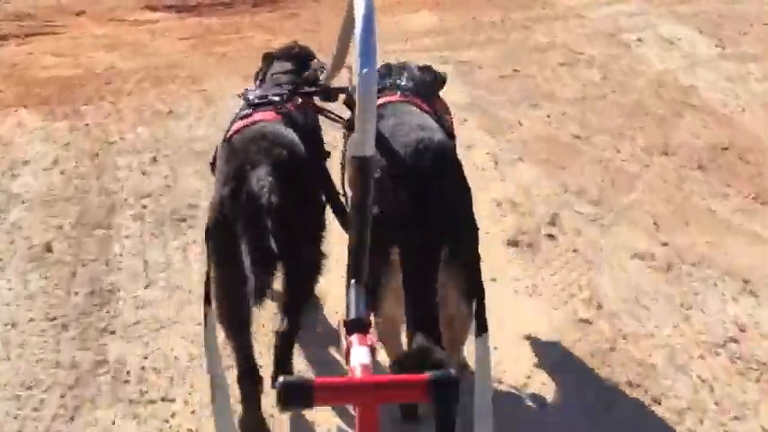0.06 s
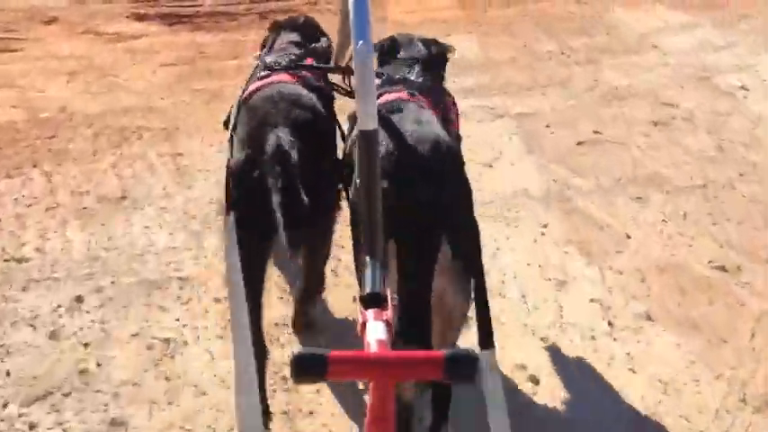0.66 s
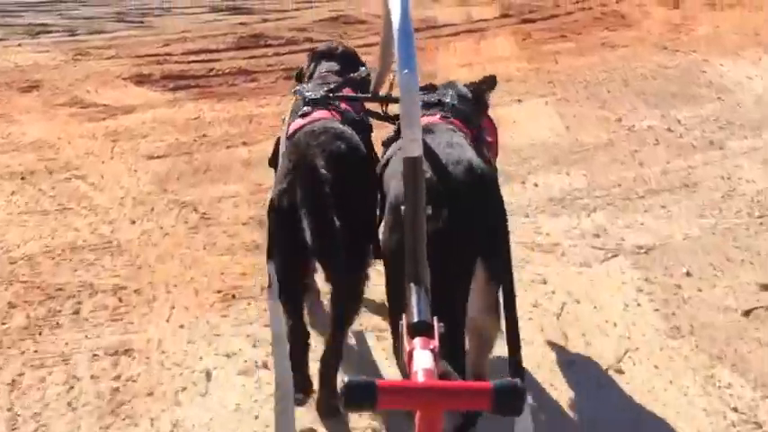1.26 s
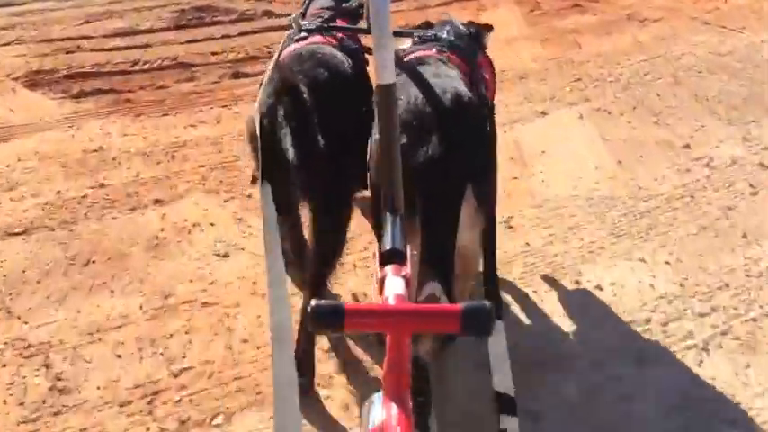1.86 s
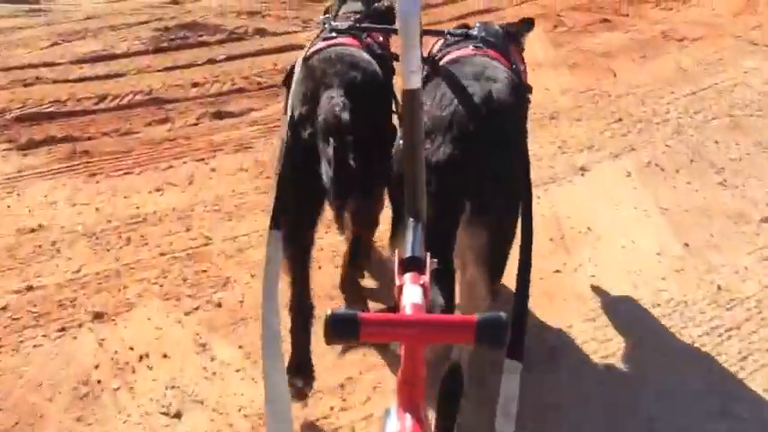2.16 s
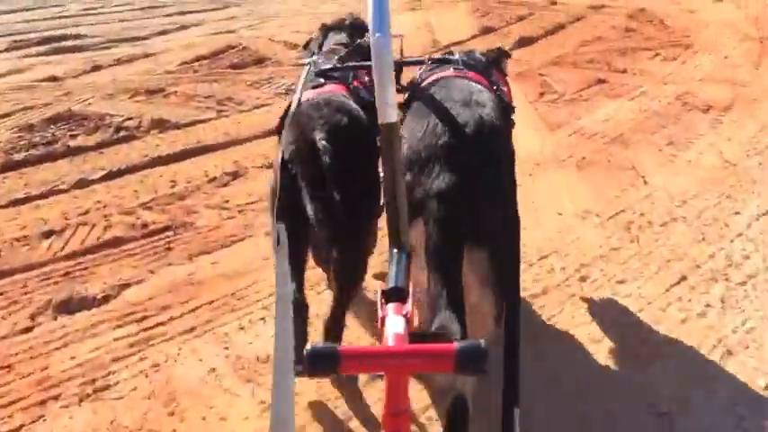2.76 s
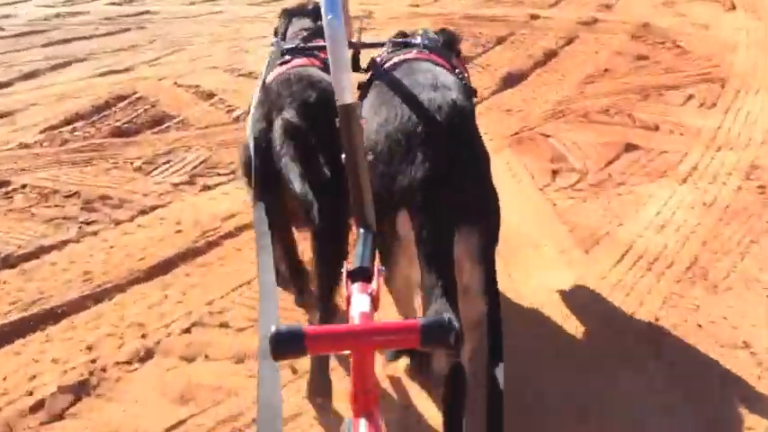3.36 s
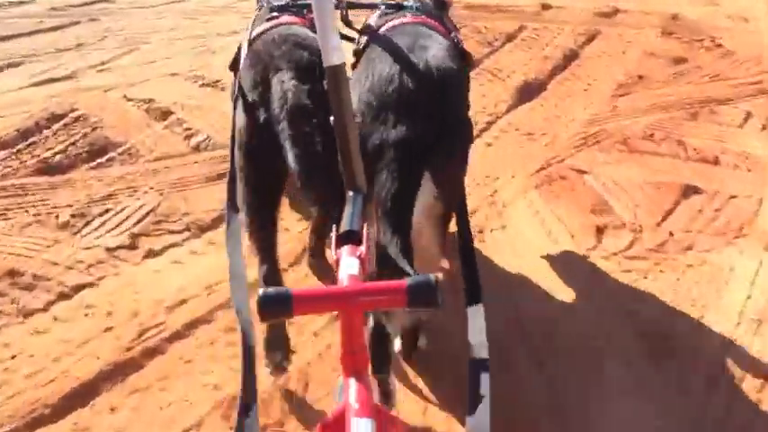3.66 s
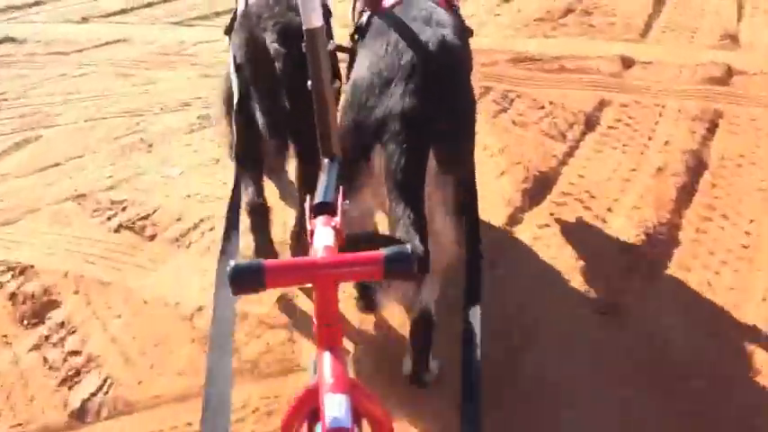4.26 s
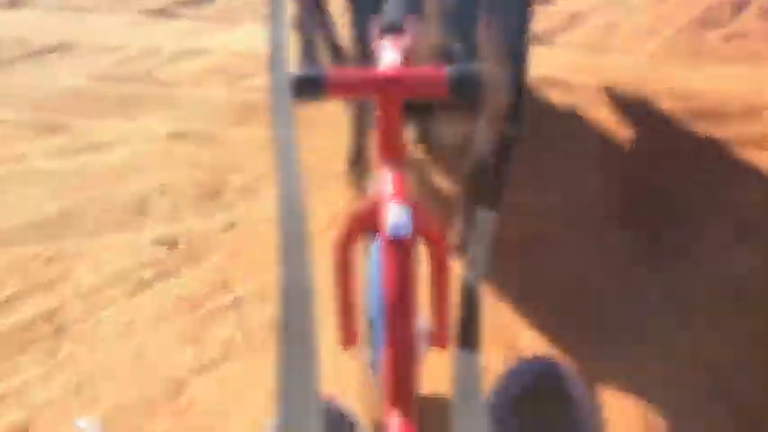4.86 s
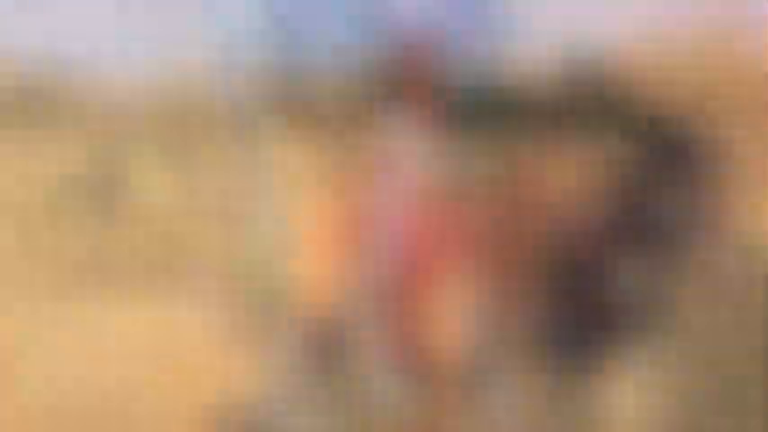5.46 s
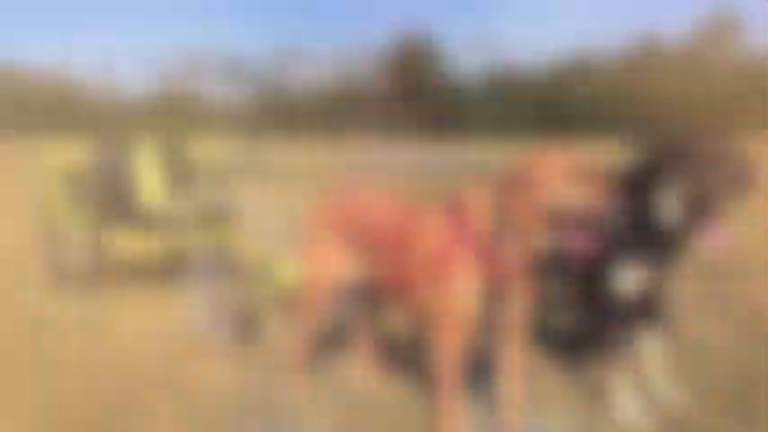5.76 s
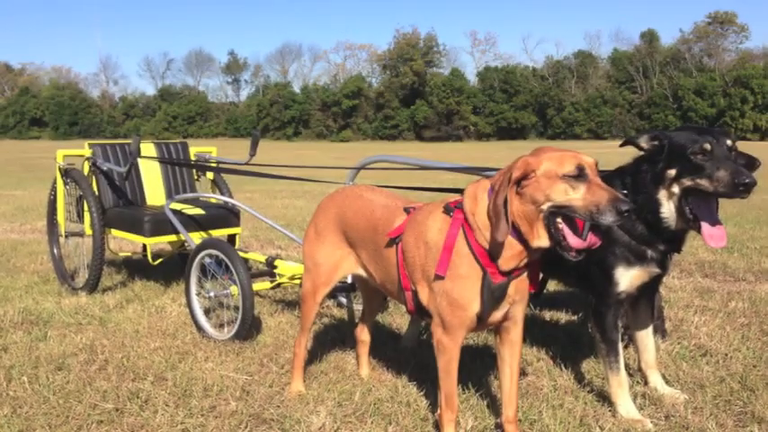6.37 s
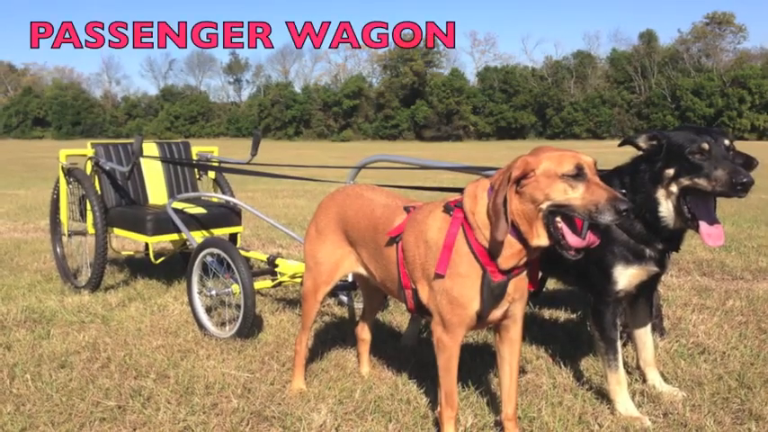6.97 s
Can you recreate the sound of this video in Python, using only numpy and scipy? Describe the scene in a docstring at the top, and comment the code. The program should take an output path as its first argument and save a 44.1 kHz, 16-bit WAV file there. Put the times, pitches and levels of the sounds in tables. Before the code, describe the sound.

Heard from on board outdoors, a small dog-drawn cart rumbles steadily across uneven dirt, with a low hum like a far engine underneath. Sand crunches softly, small stones snap under the tyres, and harness parts click and patter throughout. A small metal clink and a sharp knock sound near the start, and the wheels squeak faintly at times. The hitch judders and rattles more busily as the sound fades to silence.

```python
"""Dog cart on sandy dirt

Two dogs pull a light wheeled cart, heard from the seat. Uneven ground drives the frame into a rumble
over a low hum, perhaps a far engine. Grit crackles under tyres and paws, and friction gives a faint,
recurring, falling squeak. Impacts excite the modes of hitch, harness and frame: ticks, rattles,
dull jolts, a few clinks and one hard knock. Everything fades out."""
import sys
import numpy as np
from scipy import signal
from scipy.fft import rfft, irfft, next_fast_len
from scipy.io import wavfile

SR = 44100
rng = np.random.default_rng(int(sys.argv[2]) if len(sys.argv) > 2 else 0)


def put_to_file(sound):
    """Save the sound as 16-bit audio at rate SR, in the file named by the first command-line argument."""
    columns = np.atleast_2d(sound).T  # one column per channel
    safe = np.clip(columns, -1, 1)
    whole_steps = np.round(safe * 32767)
    wavfile.write(sys.argv[1], SR, whole_steps.astype(np.int16))


N = 308679
TIME = np.arange(N) / SR


def from_db(db):
    """Amplitude ratio of a level in decibels."""
    return 10 ** (np.asarray(db) / 20)

def unit_rms(x):
    """Normalisation to unit power."""
    return x / np.sqrt(np.mean(x ** 2) + 1e-20)

def envelopes(rows):
    """Linear interpolation of each column over time."""
    s, *columns = np.transpose(rows)
    return [np.interp(TIME, s, column) for column in columns]

def drift(rate_hz):
    """Random modulation: low-passed noise of unit rms."""
    step, settle = 40, 2000
    pole = np.exp(-2 * np.pi * rate_hz * step / SR)
    noise = rng.standard_normal(N // step + settle + 2)
    slow = signal.lfilter([1], [1, -2 * pole, pole * pole], noise)[settle:]
    return np.interp(np.arange(N) / step, np.arange(len(slow)), unit_rms(slow))

def band(x, low_hz, high_hz):
    """Band-pass filtering between two edges."""
    return signal.sosfilt(signal.butter(2, [low_hz, high_hz], "band", fs=SR, output="sos"), x)

def colour(x, spectrum):
    """Spectral shaping by a curve interpolated in log frequency."""
    hz, db = np.transpose(spectrum)
    size = next_fast_len(N)
    bins = np.maximum(np.arange(size // 2 + 1) * SR / size, 1)
    gain = from_db(np.interp(np.log(bins), np.log(hz), db, left=-70, right=-70))
    return irfft(rfft(x, size) * gain, size)[:N]

def resonate(x, hz, width_hz):
    """Forced response of a damped oscillator with unit peak gain."""
    r = np.exp(-np.pi * width_hz / SR)
    feedback = [1, -2 * r * np.cos(2 * np.pi * hz / SR), r * r]
    return signal.lfilter(np.array([1, 0, -1]) * (1 - r * r) / 2, feedback, x + 1e-18)

def grains(per_s, spread_db):
    """Shot noise: impulses at random moments, a few much larger than the rest."""
    sizes = from_db(spread_db * np.minimum(rng.exponential(1, N), 4))
    return unit_rms(sizes * rng.choice([-1, 1], N) * (rng.random(N) < per_s / SR))

def strike(impacts, modes, in_phase=False, detune=0):
    """Free vibration: each impact starts damped modes, which crack harder when in phase."""
    out, t = np.zeros(N), np.arange(SR // 8) / SR
    hz, db, t60 = np.transpose(modes)[:, :, None]
    polarity = (1 if in_phase else -1) ** np.arange(len(modes))[:, None]
    decays = polarity * from_db(db - 60 * t / t60)
    for s, level_db in impacts:
        at = int(s * SR)
        pitches = hz * (1 + detune * rng.standard_normal(hz.shape))
        out[at:at + len(t)] += from_db(level_db) * np.sum(decays * np.sin(2 * np.pi * pitches * t), 0)
    return out


# Course of the far hum: (time [s], level [dB])
HUM_LEVELS = [(0, -47.5), (1.3, -54.5), (2.0, -45.5), (3.5, -46), (4.2, -43.5), (5.4, -41.5)]
# Its partials: (harmonic number, level [dB])
HUM_HARMONICS = [(1, -24.5), (3, -7), (4, -5.5), (6, -17.5), (8, -25.5)]

def hum(fundamental_hz=39.6):
    """Harmonic series on a nearly steady fundamental; each partial wavers on its own."""
    cycles = np.cumsum(fundamental_hz * (1 + 0.00401 * drift(1.18))) / SR
    partials = sum(from_db(db + 2 * drift(6.5)) * np.sin(2 * np.pi * (k * cycles + rng.random()))
                   for k, db in HUM_HARMONICS)
    return from_db(envelopes(HUM_LEVELS)[0]) * np.sqrt(2) * partials


# Shaking of the cart: (frequency [Hz], spectral level [dB])
RUMBLE_SPECTRUM = [(20, -40.5), (40, -12.5), (62, -3), (100, -4.5), (150, 1.5), (220, -0.5), (300, -4.5),
                   (360, -11.5), (600, -21.5), (1200, -43)]
# Low modes of frame and seat: (frequency [Hz], bandwidth [Hz], level [dB])
BOOM_MODES = [(72.9, 9.7, -5.5), (131.6, 9.3, -5.5), (168.4, 4.2, -14.5), (220.6, 1.6, -10),
              (250.6, 13, -23), (273, 17, -14)]

def rumble():
    """Random forcing: uneven ground shakes the cart, which booms at its low modes."""
    shake = unit_rms(colour(rng.standard_normal(N), RUMBLE_SPECTRUM))
    booms = sum(from_db(db) * unit_rms(resonate(rng.standard_normal(N), hz, width))
                for hz, width, db in BOOM_MODES)
    return unit_rms(shake + booms) * from_db(0.93 * drift(5.8))


# Resonances of hitch and frame tubes: (frequency [Hz], bandwidth [Hz], gain [dB])
FRAME_MODES = [(367.7, 78, -6), (1220, 120, -8.5), (1822, 260, 6.5), (2400, 220, -2), (3360, 150, -14.5),
               (3782, 120, 4.5), (4013, 150, 3), (5600, 570, 5.5), (5970, 170, 9.5), (6650, 370, 12),
               (8350, 270, -9), (12820, 88, -11)]

def through_frame(x, ring_db, loose=False):
    """Structure-borne sound: tube resonances join the direct sound, and vary if parts are loose."""
    scatter = rng.standard_normal((len(FRAME_MODES), 2)) * loose
    rings = sum(from_db(db + 2.5 * louder) * resonate(x, hz * np.exp(0.045 * sharper), width)
                for (hz, width, db), (sharper, louder) in zip(FRAME_MODES, scatter))
    return x + from_db(ring_db) * rings

def pebbles(per_s):
    """Impulse responses of grains of many sizes, each ringing briefly at its own pitch."""
    pitches = np.geomspace(600, 11000, 14)
    clicks = grains(per_s, spread_db=-0.5)
    size_class = rng.integers(0, len(pitches), N)
    return sum(resonate(clicks * (size_class == k), hz, hz / 9) for k, hz in enumerate(pitches))


# Crushed sand: (frequency [Hz], gain [dB])
GRIT_SPECTRUM = [(200, 0.5), (450, 1), (800, 2), (1400, -3), (2200, -0.5), (2800, -3), (4000, -5),
                 (5500, -9), (7000, -12.5), (9000, -15.5), (12000, -17), (15500, -15)]

def grit():
    """Granular noise: sand hisses and coarser grains crack in clumps as paws and wheels press."""
    pressure = drift(18)
    hiss = rng.standard_normal(N) * from_db(0.92 * pressure)
    cracks = from_db(-0.5) * unit_rms(pebbles(per_s=2200 * from_db(6 * pressure)))
    crumbs = from_db(-9) * grains(per_s=60, spread_db=3)
    return unit_rms(colour(through_frame(hiss + cracks + crumbs, ring_db=-31.5), GRIT_SPECTRUM))


# Paw drags and tyre skids: (time [s], half duration [s], level [dB])
PAW_DRAGS = [(0.198, 0.006, -47), (2.118, 0.043, -51.5), (4.408, 0.011, -57), (6.357, 0.018, -45.5)]
TYRE_SKIDS = [(.743, .012, -56), (.789, .008, -48), (.814, 0.0081, -49), (.856, 0.018, -45.5),
              (.903, .016, -48)]
# Their timbres: (frequency [Hz], spectral level [dB])
PAW_SPECTRUM = [(1200, -13), (2500, 1), (4200, -1), (5500, -3), (9000, -32), (15500, -24)]
SKID_SPECTRUM = [(250, -2), (500, 0), (1100, -3), (1750, 8), (2600, -1), (5000, -17), (12000, -33)]

def scrapes():
    """Sliding friction: paws in sand and tyres on gravel give short swells of dense impacts."""
    out = np.zeros(N)
    for events, spectrum, per_s in [(PAW_DRAGS, PAW_SPECTRUM, 5600), (TYRE_SKIDS, SKID_SPECTRUM, 2800)]:
        swell = sum(from_db(db) * np.exp(-((TIME - s) / half) ** 2) for s, half, db in events)
        out += swell * unit_rms(colour(grains(per_s, spread_db=4.5), spectrum))
    return out


# Squeaks as the wheels turn: (time [s], chirp level [dB], slide level [dB])
SQUEAK_EVENTS = [(0.012, -49, -54.5), (0.195, -56, -65), (1.305, -51.5, -59), (2.007, -55, -61),
                 (2.742, -56, -66), (3.358, -55, -56), (4.676, -60, -60)]
# Course of one squeak: (time from onset [s], frequency [Hz], level [dB])
SQUEAK_GLIDE = [(0, 4200, -4), (0.026, 3750, -1), (0.042, 3400, -3), (.058, 3170, -9), (.075, 2930, -5),
                (0.095, 2500, -7.5), (0.125, 2050, 1), (0.188, 1790, -2.5), (.25, 1820, -5)]

def squeaks(chirp_at_s=0.0685, chirp_half_s=0.0093, roughness=0.52):
    """Stick-slip friction: a scratchy tone falls about an octave, ringing clear for one chirp."""
    out = np.zeros(N)
    s, hz, db = np.transpose(SQUEAK_GLIDE)
    t = np.arange(int(s[-1] * SR)) / SR
    scratch = drift(127) + 1j * drift(127)
    catching = scratch / (1 + np.exp(-1.5 * drift(45)))   # the contact grips and lets go
    waver = 0.015 * drift(40)
    chirp_window = np.exp(-((t - chirp_at_s) / chirp_half_s) ** 2)
    for start, chirp_db, slide_db in SQUEAK_EVENTS:
        span = slice(int(start * SR), int(start * SR) + len(t))
        cycles = np.cumsum(np.interp(t, s, hz) * (1 + waver[span])) / SR
        chirp = from_db(chirp_db) * chirp_window * (1 + roughness * scratch[span])
        slide = from_db(slide_db + np.interp(t, s, db)) * catching[span]
        out[span] += np.real((chirp + slide) * np.exp(2j * np.pi * cycles))
    return from_db(2.5) * out


# Stones under the tyres: (time [s], relative level [dB])
STONE_SNAPS = [(0.198, 1), (0.5645, 3), (0.651, -2), (0.742, 2), (0.789, -2), (0.814, 5), (0.85, 9.5),
               (1.297, 8), (1.78, 8), (1.846, 1), (2.163, 2), (2.173, 4), (2.503, -2), (2.533, -2),
               (2.546, -5), (2.697, -3), (2.86, -3), (3.2025, -5), (3.353, -9), (3.679, -4), (3.692, -5),
               (4.34, 3), (4.484, 7), (5.087, 5.5), (5.367, 1), (6.073, 7)]

def stones(decay_s=0.0022):
    """Broadband transients: each stone snaps and excites four resonances of its own."""
    out, t = np.zeros(N), np.arange(SR // 40) / SR
    for s, db in STONE_SNAPS:
        at = int(s * SR)
        snap = rng.standard_normal(len(t)) * np.exp(-t / decay_s)
        pitches = np.geomspace(3200, 12000, 4) * rng.uniform(0.75, 1.25, 4)
        ring = from_db(-7) * sum(resonate(snap, hz, hz / 20) for hz in pitches)
        out[at:at + len(t)] += from_db(db - 44) * band(snap + ring, 1800, 10300)
    return out


# Jolts from ruts: (time [s], level [dB])
RUT_JOLTS = [(0.415, 2.5), (0.436, 3), (0.4805, 4), (0.531, 2.5), (0.813, -3), (1.4485, 1), (2.181, -2),
             (2.212, 2), (3.186, -1.5), (3.313, -5), (3.852, -4), (4.313, -1.5), (4.391, -3)]
# Modes of the seat: (frequency [Hz], level [dB], T60 [s])
SEAT_MODES = [(154.6, -27.5, 0.046), (201, -34, 0.043)]

def seat_jolts():
    """Shock excitation: ruts drum the seat, too small a radiator for deep bass."""
    return band(strike(RUT_JOLTS, SEAT_MODES, detune=0.067), 115.5, 594)


# The pole meets its stop: (time [s], level [dB])
STOP_IMPACTS = [(0.488, 1.5), (0.838, 0.5), (0.8505, -4), (1.917, -6), (3.3125, -0.5), (4.2035, -3.5),
                (4.854, -3), (5.417, 2.5), (5.436, -1), (5.8928, 10)]
# Modes of that contact: (frequency [Hz], level [dB], T60 [s])
STOP_MODES = [(317, -27.5, 0.0095), (524, -38.5, 0.02), (875, -43, 0.013), (1430, -38.5, 0.0085),
              (1830, -42, 0.031), (2334, -39, 0.058), (3470, -41.5, 0.018), (5560, -53, 0.0083)]

def pole_butts():
    """Damped impact: the loose pole butts dully, at slightly different pitches each time."""
    return strike(STOP_IMPACTS, STOP_MODES, detune=0.067)


# Slips of the hitch: (time [s], level [dB])
HITCH_SLIPS = [(4.3080, -2), (4.3132, 11.5), (4.3164, 9.5), (4.3182, -17.5), (4.3212, 0), (4.3242, -8)]
# Modes of the hitch: (frequency [Hz], level [dB], T60 [s])
HITCH_MODES = [(850, -50, 0.013), (1430, -40, 0.0084), (1850, -40.5, 0.0099), (2280, -39.5, 0.028),
               (2620, -40.5, 0.017), (3134, -49, 0.067), (3470, -42.5, 0.011), (4600, -50, 0.021)]

def hitch_judder():
    """Stick-slip motion: a quick run of slips sets the hitch ringing."""
    return strike(HITCH_SLIPS, HITCH_MODES)


# Contacts of a snap hook: (time [s], level [dB])
HOOK_IMPACTS = [(1.2943, -20), (1.2957, 3), (1.3005, -26), (1.3043, -24), (1.3091, -7), (3.5197, -3.5),
                (4.457, -4)]
# Modes of the hook: (frequency [Hz], level [dB], T60 [s])
HOOK_MODES = [(3750, -29, .013), (4550, -45, .025), (5170, -45, .03), (5700, -38, .028), (6005, -41, .06),
              (6450, -48, .06), (6880, -42, .055), (8100, -48, .02), (12400, -47, .02)]

def hook_clinks():
    """Impact and rebound: a small metal hook rings at its high modes."""
    return strike(HOOK_IMPACTS, HOOK_MODES)


# Contacts within the one knock: (time [s], level [dB])
KNOCK_IMPACTS = [(1.4493, -10), (1.4501, 0), (1.4517, -11.5)]
# Modes of the pole: (frequency [Hz], level [dB], T60 [s])
POLE_MODES = [(330, -35.5, 0.028), (530, -24, 0.012), (750, -31.5, 0.011), (880, -24.5, 0.014),
              (1276, -26.5, 0.0069), (1640, -24, 0.014), (1820, -17, 0.016), (2055, -13, 0.012),
              (2730, -24.5, .007), (3190, -16, 0.017), (3626, -25.5, 0.039), (4200, -10.5, 0.0056),
              (5080, -20, 0.012), (8200, -13.5, 0.005), (11980, -28, 0.0061)]

def pole_knock(shiver_decay_s=0.01):
    """Hard impact: the pole knocks in its joint, its modes start in phase and the frame shivers."""
    age = np.maximum(TIME - KNOCK_IMPACTS[-1][0], 0)
    shiver = unit_rms(band(through_frame(rng.standard_normal(N), ring_db=-14), 330, 5800))
    crack = band(strike(KNOCK_IMPACTS, POLE_MODES, in_phase=True), 150, 14500)
    return from_db(-0.5) * crack + from_db(-28.5) * shiver * (age > 0) * np.exp(-age / shiver_decay_s)


# Thud, clack, main and snap bands of a rattle: (low edge [Hz], high edge [Hz])
RATTLE_BANDS = [(240, 950), (1250, 2100), (2250, 5700), (5800, 15500)]

def bursts(chatter, events, bands_db):
    """Repeated collision: a loose part chatters and dies away; harder contacts are brighter."""
    part_pitches = np.geomspace(418.2, 10520, 10) * np.exp(rng.uniform(-0.2, 0.2, (len(events), 10)))
    out = np.zeros(N)
    for (s, decay, db, hardness_db), pitches in zip(events, part_pitches):
        at = int(s * SR)
        age = np.arange(SR // 8) / (decay * SR)   # in decay times
        tail = from_db(-18) * np.exp(-age / 3.3) * np.minimum(age, 1)
        swell = np.sqrt(age) * np.exp(-age) + tail
        burst = through_frame(chatter[at:at + len(age)] * swell, ring_db=1, loose=True)
        own_ring = from_db(6.5) * sum(resonate(burst, hz, 40 + hz / 35) for hz in pitches)
        levels_db = db + np.array(bands_db) + hardness_db * np.array([0, 0, 1, 1])
        for edges, level_db in zip(RATTLE_BANDS, levels_db):
            part = band(burst + own_ring, *edges)
            out[at:at + len(age)] += from_db(level_db) * part * np.sqrt(decay * SR / np.sum(part ** 2))
    return out

def patter(chatter, per_s=5, decay_s=0.0011):
    """Jittered pulse train: claws and straps tick faintly at an uneven pace."""
    jitter, softness = rng.standard_normal((60, 2)).T
    times = (np.arange(60) + 1 + 0.3 * jitter) / per_s
    events = [(s, decay_s, db, 0) for s, db in zip(times, -54.5 - 3.5 * softness) if 0 < s < 6.5]
    return bursts(chatter, events, bands_db=(5, -1, 0, -12))


# Bursts of contact: (time [s], decay time [s], level [dB], hardness [dB])
BUCKLE_TICKS = [(.139, 0.003, -45.5, -2), (.282, .0024, -55.5, 5), (.391, 0.0016, -43, -1),
                (.458, 0.0048, -43.5, -0.5), (.564, 0.00065, -37, 2), (.7135, 0.0011, -41.5, -4),
                (.735, 0.0044, -45.5, -1.5), (.852, 0.006, -39, 0), (.974, 0.0018, -43, -5.5),
                (1.0995, 0.0013, -44, -3), (1.1185, 0.0023, -48, -0.5), (1.268, .001, -47, -1),
                (1.34, 0.003, -48, -1), (1.415, 0.0081, -51, 1), (1.4272, 0.0011, -45, -1),
                (1.523, 0.011, -50, -3.5), (1.7165, .001, -46.5, -2), (1.7796, 0.0012, -36.5, -1.5),
                (1.8125, 0.0041, -46.5, -0.5), (2.546, 0.00048, -35.5, 1), (2.9765, 0.0022, -43, -4),
                (3.102, 0.0015, -48, 0), (3.126, 0.00066, -48, -2), (3.4675, 0.0015, -32.5, -1.5),
                (3.516, 0.0072, -50, 0.5), (3.7708, 0.00079, -45, 2), (3.963, 0.00099, -43.5, -4.5),
                (3.986, 0.0022, -47.5, -1.5), (4.313, 0.006, -42, -1.5), (4.481, 0.0028, -45, 1),
                (4.558, 0.013, -46.5, -2), (4.7796, 0.0034, -39, 1.5), (4.826, .0012, -47, -2),
                (4.874, 0.0073, -42, 0.5), (4.902, 0.00071, -44, 2), (4.93, 0.0013, -41.5, -1),
                (4.9969, 0.0015, -37.5, 2.5), (5.0268, 0.0033, -41, 4), (5.122, 0.0023, -47.5, 3.5),
                (5.2207, 0.0013, -44, -9), (5.2738, 0.0018, -41.5, -4.5), (5.3345, 0.0014, -46, 1),
                (5.3543, .001, -47, -2), (5.3727, 0.0016, -43, 0.5), (5.574, 0.0013, -38, 0.5),
                (5.6195, .0008, -45, -1), (5.654, .001, -46, -0.5), (5.7305, 0.0015, -46, 2),
                (5.7494, 0.0011, -47, 2), (5.848, 0.0012, -49, 0), (5.9765, 0.00092, -44, -1),
                (6.07, 0.002, -42, -2)]
HITCH_CLACKS = [(1.049, 0.004, -44.5, 2.5), (3.495, 0.0078, -50.5, 2), (3.768, 0.01, -55, 1),
                (3.8105, 0.0064, -49, -2), (3.87, 0.0066, -54, 1), (4.201, 0.0071, -44.5, -4.5),
                (4.308, 0.0065, -45, -1), (4.434, 0.0049, -44.5, 1), (4.453, 0.014, -45.5, -3),
                (5.162, 0.0071, -55.5, -5), (5.4165, 0.0071, -42.5, -5), (5.4327, 0.0054, -38.5, -3),
                (5.512, 0.0065, -51.5, -13)]
FRAME_THUMPS = [(0.729, 0.015, -53.5, -8), (0.782, 0.027, -49.5, -2), (0.835, 0.015, -47, -6),
                (1.914, 0.0061, -48, -3), (2.159, 0.0084, -54, 2.5), (2.855, 0.015, -55, -2.5),
                (2.94, 0.013, -56.5, -5), (3.165, 0.0021, -55, 4), (3.312, 0.0087, -43.5, -0.5),
                (3.85, 0.005, -43, -1), (4.709, 0.014, -51, -16), (4.765, 0.0042, -50, -24),
                (4.853, 0.007, -45.5, -3), (5.89, 0.0054, -40, -11), (6.202, .005, -50.5, -9)]

def rattles():
    """Contact noise: buckles tick, the pulled hitch clacks and the frame thumps over lumps."""
    contacts = grains(per_s=4000, spread_db=3)
    chatter = signal.lfilter([1], [1, -0.65], contacts)   # the contacts are slightly soft
    ticks = bursts(chatter, BUCKLE_TICKS, bands_db=(-6.5, -1, 6, 2))
    clacks = bursts(chatter, HITCH_CLACKS, bands_db=(-1, 8, 5.5, 0))
    thumps = bursts(chatter, FRAME_THUMPS, bands_db=(4.8, 3.9, 7, 2.2))
    return from_db(1.5) * (ticks + clacks + thumps + patter(chatter))

def shaking(half_s=0.023):
    """Amplitude envelope, 0 to 1: around each thump the cart shakes and the tyres bite."""
    coarse = TIME[::100]
    swells = sum(np.exp(-((coarse - s - half_s / 2) / half_s) ** 2) for s, *_ in FRAME_THUMPS)
    return np.interp(TIME, coarse, np.minimum(swells, 1))


# Course of the rolling noise: (time [s], rumble level [dB], grit level [dB])
ROLLING_LEVELS = [(0.0, -47.5, -55.5), (0.54, -46, -57.5), (0.96, -46, -56.5), (1.08, -46, -56.5),
                  (2.02, -46, -58), (3.01, -47.5, -56), (4.51, -46, -58), (4.87, -46, -57),
                  (5.19, -45.5, -56.5), (5.4, -44.5, -55.5), (5.7, -46, -55)]

def scene():
    """Superposition in open air; the hollow pole rings in sympathy with rattles and grit."""
    rumble_db, grit_db = envelopes(ROLLING_LEVELS)
    shake = shaking()
    low = from_db(rumble_db + 1.5 + 3 * shake) * rumble() + hum()
    impacts = pole_knock() + hook_clinks() + hitch_judder() + seat_jolts() + pole_butts()
    friction = squeaks() + scrapes()
    ground = from_db(grit_db + 4 + 1.5 * shake) * grit()
    rattling = rattles()
    pole_ring = from_db(4.5) * resonate(rattling + from_db(-4.5) * ground, hz=1820, width_hz=47)
    return (low + ground + rattling + pole_ring + impacts + friction + stones())[None]

def record(dry, fade_start_s=4.51, fade_end_s=6.528, cutoff_hz=15450):
    """Attenuation: a linear fade to silence and a steep low-pass filter."""
    fade = np.clip((fade_end_s - TIME) / (fade_end_s - fade_start_s), 0, 1)
    low_pass = signal.ellip(10, 0.2, 70, cutoff_hz, fs=SR, output="sos")
    return signal.sosfilt(low_pass, from_db(-2) * fade * dry)


dry = scene()
out = record(dry)
put_to_file(out)
```